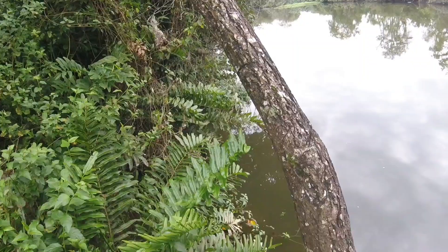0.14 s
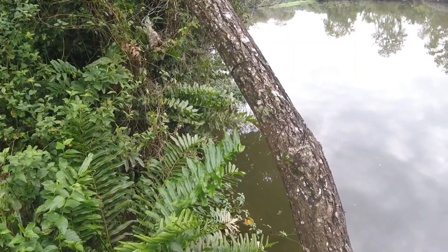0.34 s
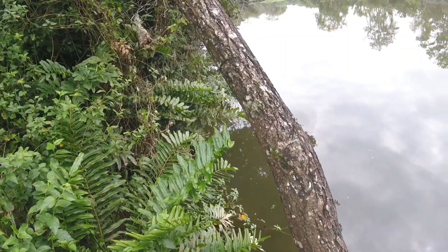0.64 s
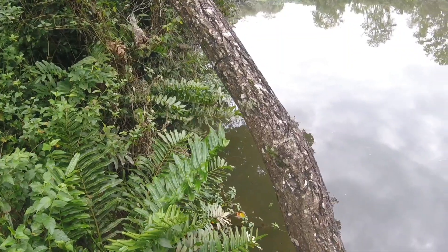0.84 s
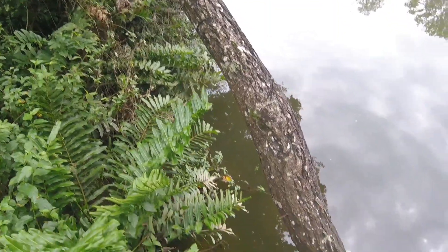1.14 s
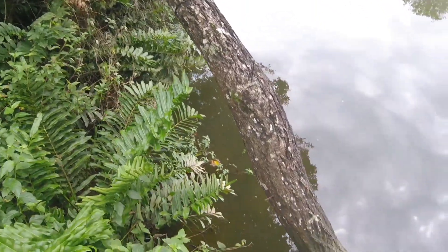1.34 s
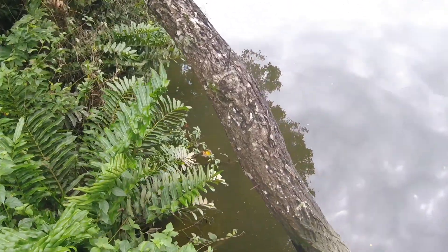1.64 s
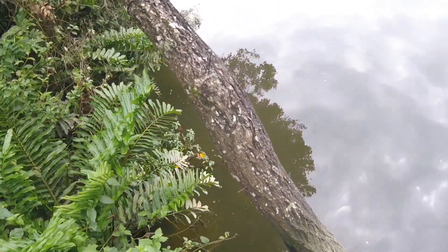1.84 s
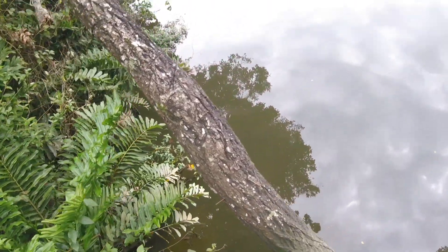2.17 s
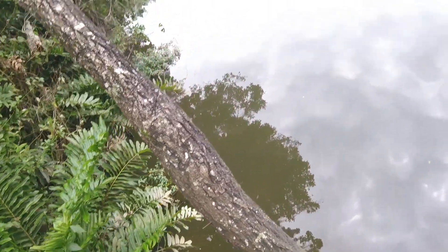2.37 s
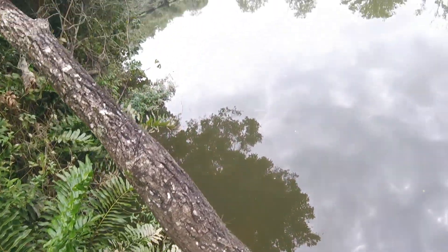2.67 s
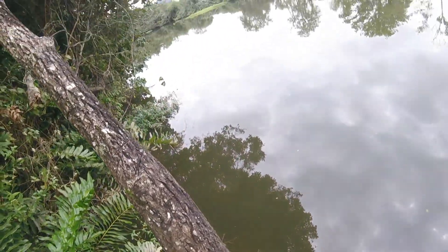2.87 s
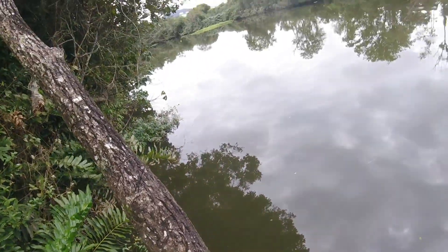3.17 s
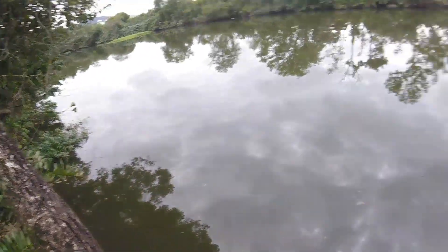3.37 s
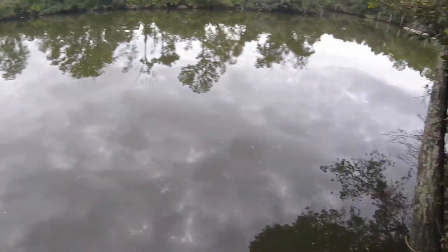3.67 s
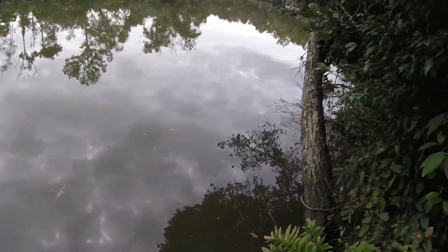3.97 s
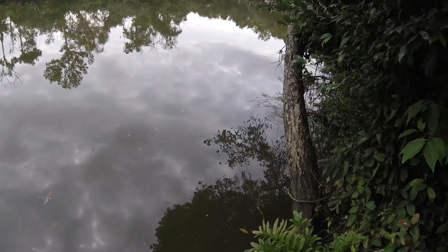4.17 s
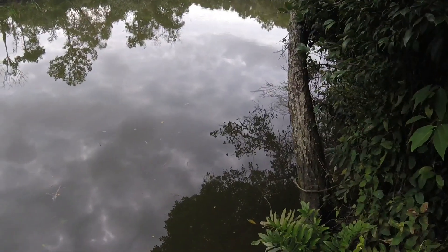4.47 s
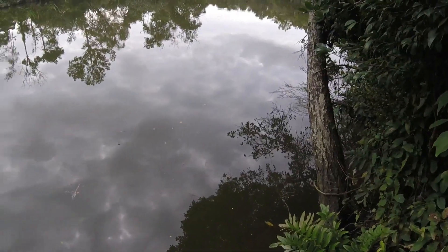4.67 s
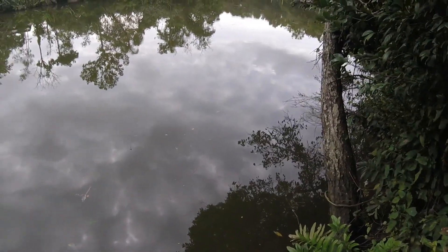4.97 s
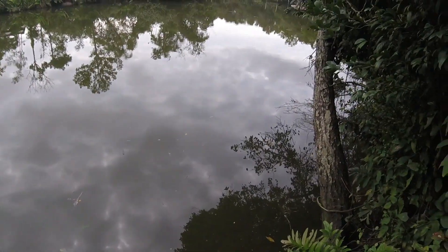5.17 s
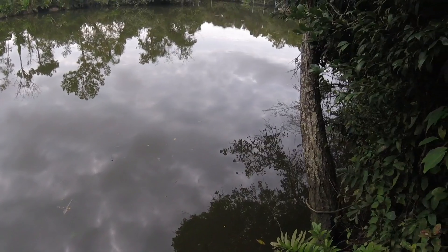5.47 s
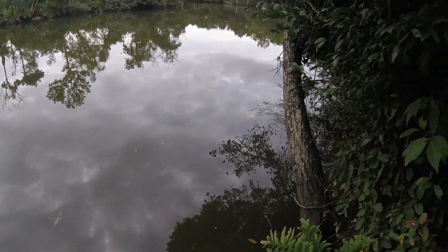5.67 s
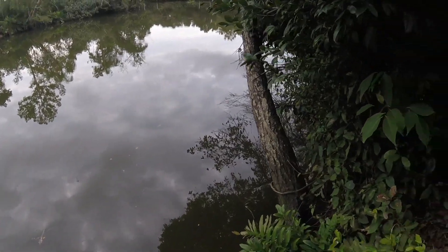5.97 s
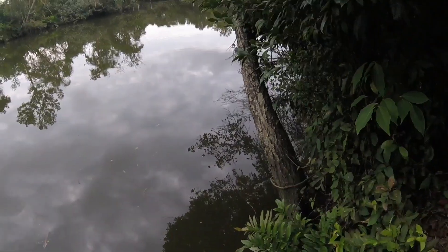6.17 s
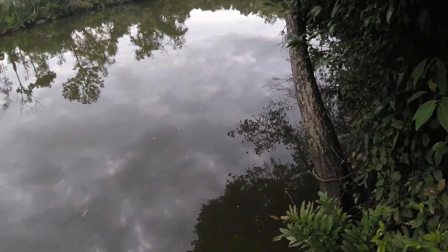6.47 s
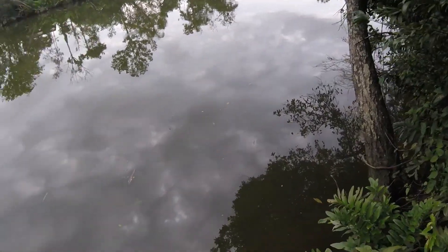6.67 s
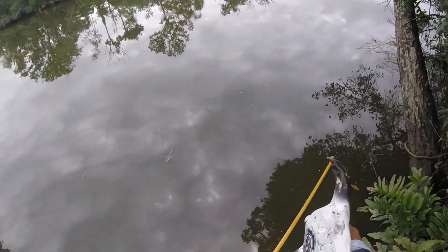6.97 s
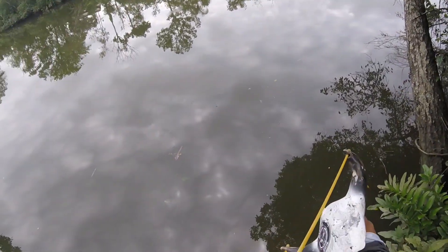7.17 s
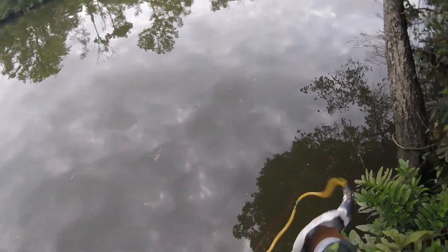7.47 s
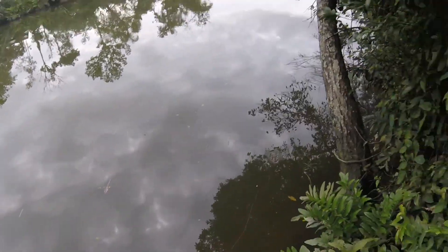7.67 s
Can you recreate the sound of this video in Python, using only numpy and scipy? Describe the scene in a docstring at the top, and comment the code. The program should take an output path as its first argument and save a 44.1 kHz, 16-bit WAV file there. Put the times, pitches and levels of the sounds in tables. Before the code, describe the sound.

Outdoors at a quiet pond, low far traffic rumbles under a thin, high insect hiss and a fast warbling cricket. A small animal's rattling trill starts slowly, quickens, and stops near the middle. Faint leaf swishes pass, a bird chips twice, and at the end gear close to the microphone knocks hollowly, scrapes and snaps.

```python
"""A still pond bank: far traffic rumbles under a chorus of insects, a cricket warbles,
a small animal trills and a bird chips twice. Noise shaped by spectra gives rumble, wind and chorus;
gliding sines and resonances give the engine and the voices. At the end gear is handled close to the
microphone: damped modes give hollow knocks, a sharp snap and scraping, and slow sines give low jolts."""
import sys
import numpy as np
from scipy import signal
from scipy.fft import rfft, irfft
from scipy.io import wavfile
from scipy.ndimage import uniform_filter1d

SR = 44100
rng = np.random.default_rng(int(sys.argv[2]) if len(sys.argv) > 2 else 0)


def persist_wave(psi):
    """Save psi, clipped to +-1, as 16-bit WAV."""
    counts = np.round(np.clip(psi, -1, 1) * 32767).astype(np.int16)
    wavfile.write(sys.argv[1], SR, np.atleast_2d(counts).T)


N = 345243  # length in samples


def amp(db):
    """Level: an amplitude ratio is ten to the power of dB / 20."""
    return 10 ** (np.asarray(db) / 20)


def evened(x):
    """Normalisation: dividing by the root mean square gives rms 1."""
    return x / np.sqrt(np.mean(x ** 2) + 1e-20)


def add(mix, s, sound):
    """Superposition: adds the sound to the mix from second s."""
    part = mix[round(s * SR):][:len(sound)]
    part += sound[:len(part)]


def resonate(x, hz, width):
    """Resonance by heterodyning: shifts hz down to zero, smooths, and shifts back, with gain 1."""
    turn = np.exp(2j * np.pi * np.cumsum(hz * np.ones(len(x))) / SR)
    r = np.exp(-np.pi * width / SR)
    return 2 * (turn * signal.lfilter([1 - r], [1, -r], x / turn)).real


def whistle(count, hz, width):
    """Narrow-band noise: a resonance applied twice to white noise gives a fuzzy tone of rms 1."""
    once = resonate(rng.standard_normal(count), hz, width)
    return evened(resonate(once, hz, width))


def hiss(spectrum, patchy_db):
    """Coloured noise: random short-time spectra with drifting patches, filtered to a spectrum, rms 1."""
    frames = N // 256 + 5
    a, b, patches = rng.standard_normal((frames, 513, 3)).T
    patches = uniform_filter1d(patches, size=14, axis=0)  # across frequency
    patches = evened(uniform_filter1d(patches, size=16, axis=1))  # across time
    fine = signal.istft((a + 1j * b) * amp(patchy_db * patches), nperseg=1024, noverlap=768)[1][:N]
    f, db = np.transpose(spectrum)
    log_hz = np.log(np.fft.rfftfreq(N, 1 / SR) + 1)
    gain = amp(np.interp(log_hz, np.log(f + 1), db))
    return evened(irfft(rfft(fine) * gain, N))


def glide(s, end, hz, db):
    """Frequency modulation: a soft-edged sine whose phase is the running sum of hz from s to end."""
    hz = (hz * np.ones(N))[round(s * SR):round(end * SR)]
    tone = np.sin(2 * np.pi * np.cumsum(hz) / SR)
    return s, amp(db) * tone * signal.windows.tukey(len(hz), .7)


def outdoors(x, t60, wet_db):
    """Diffuse scattering: trees and banks return a short tail that decays exponentially."""
    t = np.arange(SR // 2) / SR
    tail = rng.standard_normal(len(t)) * amp(-60 * t / t60) * (t > .004)
    return x + amp(wet_db) * signal.fftconvolve(x, tail / np.linalg.norm(tail))[:N]


def traffic():
    """Broadband and harmonic sources: rumble, steady drones, an engine's multiples and one brief tone."""
    # Far traffic and air. Each row: frequency in Hz, relative density in dB per Hz.
    rumble = [(26, -13.5), (45, 1.5), (70, -1.5), (91, -9.5), (112, -12), (168, -17.5), (251, -18),
              (290, -23), (614, -30), (1150, -33.5), (2500, -41), (3500, -44.5), (4000, -48), (4600, -51.5),
              (6000, -82)]
    # Steady drones of far machinery. Each row: frequency in Hz, width of one resonance in Hz, level in dB.
    drones = [(63.44, 5.8, -66.5), (122.7, 3.8, -64), (180.3, 5.8, -65), (249.5, 4.3, -74)]
    # A far engine revs up, eases off and climbs again. Each row: time in seconds, turns per second.
    engine_speed = [(2.3, 59), (2.55, 63), (3.47, 78), (3.62, 71.3), (3.88, 65.3), (4.4, 72.5), (5.6, 81)]
    # Multiples of its speed that carry this far. Each row: multiple, start and end in seconds, level in dB.
    engine_tones = [(4, 2.25, 2.62, -58), (4, 2.55, 2.92, -61), (7, 2.33, 2.65, -64), (6, 2.5, 3.1, -62),
                    (3, 2.55, 3.45, -62), (5, 2.95, 3.47, -62), (6, 3.0, 3.4, -69), (6, 3.62, 3.88, -61),
                    (2, 4.4, 5.6, -62)]
    # A brief steady tone: start and end in seconds, frequency in Hz, level in dB.
    brief_tone = (.1, .7, 535, -68)

    out = amp(-47) * hiss(rumble, patchy_db=-1.0)
    out += sum(amp(db) * whistle(N, hz, width) for hz, width, db in drones)
    speed = np.interp(np.arange(N) / SR, *np.transpose(engine_speed))
    for multiple, s, end, db in engine_tones:
        add(out, *glide(s, end, multiple * speed, db))
    add(out, *glide(*brief_tone))
    return out


def wind():
    """Pressure fluctuation: slow, lumpy air pressure on the microphone, mostly below the range of pitch."""
    # Gusts. Each row: centre in seconds, time from the centre to 1/e of the rise in seconds, rise in dB.
    gusts = [(0.0, 0.44, 6), (2.2, 1, 2.7), (6.6, 0.15, 10)]
    t = np.arange(N) / SR
    db = -53 + sum(rise_db * np.exp(-((t - s) / length) ** 2) for s, length, rise_db in gusts)
    # frequency in Hz, relative density in dB per Hz
    spectrum = [(4, -11), (12, 3.5), (20, 21.0), (32, 2.5), (45, -20), (60, -51.0)]
    return amp(db) * hiss(spectrum, patchy_db=-1.0)


def insects():
    """Incoherent sum and frequency modulation: a chorus, two steady crickets and one that warbles down."""
    # Many far insects merged into a hiss. Each row: frequency in Hz, relative density in dB per Hz.
    chorus = [(4300, -37), (4800, -16), (5200, -12.5), (6050, -14.5), (6480, -1), (6900, -7.5), (7600, -10),
              (9000, -12.5), (9900, -18.5), (10700, -21), (12200, -16.5), (13600, -24.5), (14500, -39),
              (15500, -68)]
    # Two steadier crickets. Each row: frequency in Hz, width of one resonance in Hz, level in dB.
    singers = [(5100, 30, -82), (4925, 60, -81)]
    # The warbling cricket's three notes. Each row: centre and length as shares of the cycle,
    # top pitch in Hz before the waver, level in dB before the waver and echo.
    cricket_notes = [(.03, .52, 5300, -71.5), (.39, .38, 5125, -73), (.67, .32, 4950, -75)]
    # Its pace. Each row: time in seconds, cycles sung.
    cricket_pace = [(0, -.23), (2.0, 13.76), (4.0, 27.99), (4.85, 33.84), (5.55, 38.95), (6.5, 45.62),
                    (7.83, 54.95)]
    note_arch_hz = 110  # each note bends up by this much and back
    waver_hz, waver_db = 30., 3.0  # rms

    out = amp(-65.5) * hiss(chorus, patchy_db=0.5)
    out += sum(amp(db) * whistle(N, hz, width) for hz, width, db in singers)
    cycle = np.interp(np.arange(N) / SR, *np.transpose(cricket_pace))
    waver = evened(uniform_filter1d(rng.standard_normal((2, N)), size=550))
    centre, length, hz, db = np.transpose(cricket_notes)[:, :, None]
    from_centre = (cycle - centre + .5) % 1 - .5
    arch = np.cos(np.pi * np.clip(from_centre / length, -.5, .5))
    pitch = hz + note_arch_hz * (arch - 1) + waver_hz * waver[0]
    loudness = amp(db + waver_db * waver[1]) * np.sqrt(abs(arch))
    notes = loudness * np.sin(2 * np.pi * np.cumsum(pitch, axis=1) / SR)
    return out + outdoors(notes.sum(0), t60=0.16, wet_db=-5.0)


def leaves():
    """Band-limited noise: each soft swish of leaves swells and fades under a raised cosine."""
    # Each row: centre in seconds, half of the whole length in seconds, centre frequency in Hz,
    # width of one resonance in Hz, level in dB before the swell.
    swishes = [(1.578, 0.11, 7450, 2500, -70), (1.98, .2, 5960, 900, -64.5),
               (2.162, 0.14, 6570, 1500, -64.5), (2.541, 0.091, 6760, 2500, -65),
               (2.203, .3, 1140, 600, -68.5), (3.886, 0.043, 1450, 600, -66),
               (4.914, .06, 8300, 1200, -68.5)]
    out = np.zeros(N)
    for s, length, hz, width, db in swishes:
        count = round(2 * length * SR)
        add(out, s - length, amp(db) * whistle(count, hz, width) * np.hanning(count))
    return out


def bird():
    """Exponential glide: each chip is a near sine that drops fast and then levels off."""
    # Each row: start in seconds, start and end pitch in Hz, level in dB before the fade and echo.
    chips = [(5.356, 6350, 5150, -69), (5.502, 6350, 5080, -66)]
    out, t = np.zeros(N), np.arange(round(.11 * SR)) / SR
    fade = signal.windows.tukey(len(t), .25) * amp(-80 * np.maximum(t - .03, 0))
    for s, hz, end_hz, db in chips:
        pitch = end_hz + (hz - end_hz) * np.exp(-t / .022)
        add(out, s, amp(db) * np.sin(2 * np.pi * np.cumsum(pitch) / SR) * fade)
    return outdoors(out, t60=.2, wet_db=-6)


def trill(gap=0.0071, pip_length=0.0043, stroke_length=0.004, length=0.0034, lead_db=-7.0, fade_db=-4.5):
    """Pulsed resonance: a pip and a steep falling stroke, over pulses that ring the throat's modes."""
    # Syllables: times in seconds, each 3 ms ahead of the middle of its pip.
    syllables = [.8994, 1.0237, 1.1537, 1.282, 1.3966, 1.5013, 1.606, 1.7005, 1.7923, 1.8733, 1.9558,
                 2.0245, 2.093, 2.156, 2.222, 2.282, 2.3406, 2.3979, 2.4545, 2.509, 2.5587, 2.6112, 2.6624,
                 2.7182, 2.7713, 2.8265, 2.8816, 2.9347, 2.9897, 3.043, 3.0979, 3.1557, 3.213, 3.2674,
                 3.3302, 3.3967, 3.455, 3.5442]
    # How the voice changes. Each row: time in seconds, effort in dB, pip pitch in Hz, pip over the pulses
    # in dB, falling stroke over the pulses in dB, stretch of the modes (ratio), centre of their ring in Hz.
    throat = [(.9, -69, 2900, -6, -11, 1., 3000), (1.5, -62, 2960, 0, -8, 0.98, 3020),
              (1.6, -59.5, 2220, -6, -16, 0.93, 3150), (1.7, -56.5, 2560, -6, -12, 0.89, 3300),
              (1.8, -53.5, 2600, -6, -10, 0.94, 3300), (1.9, -53.5, 2950, -5, -6, 0.91, 3270),
              (2.03, -52, 3340, -7, 1, 0.96, 3050), (2.23, -55, 3500, -4, 1, 0.98, 2950),
              (2.28, -52.5, 2600, -3, 4, 1, 2950), (2.35, -52.5, 2630, 2, -3, 1, 2950),
              (2.5, -55.5, 2720, 3, 4.5, 1, 2950), (2.65, -53.5, 2930, 2, 1, 0.96, 3000),
              (3.25, -53.5, 2880, 4, -5, 0.97, 2980), (3.4, -51.5, 2750, -4, -5, 1, 2840),
              (3.55, -53, 2520, -4, -6, .97, 2700)]
    # Modes of the throat. Each row: frequency in Hz before the stretch, relative level in dB.
    throat_modes = [(2287, -6), (2620, -4.5), (2965, -4.5), (3340, -4.5), (3670, -4)]
    stroke_hz, stroke_slope = 2885, -95000  # Hz at the middle of the stroke, Hz per s
    off_centre_db = -2.6  # loss of a mode 500 Hz from the centre, growing from pulse to pulse

    out, t = np.zeros((4, N)), np.arange(round(.07 * SR)) / SR - .024
    times, *columns = np.transpose(throat)
    mode_hz, mode_db = np.transpose(throat_modes)[:, :, None]
    pulse = np.array([-1, 1, 2, 3])[:, None, None]  # a faint lead-in, then three fading pulses
    pulse_db = np.where(pulse < 0, lead_db, fade_db * (pulse - 1))
    shape = np.exp(-((t - gap * pulse) / length) ** 2)
    u = t - gap  # time from the middle of the stroke
    stroke_shape = np.exp(-(u / stroke_length) ** 2)
    stroke_wave = stroke_shape * np.sin(2 * np.pi * (stroke_hz + stroke_slope * u / 2) * u)
    chances = rng.standard_normal((len(syllables), 3, 4, 5, 1))
    for k, (s, chance) in enumerate(zip(syllables, chances)):
        db, pip_hz, pip_db, stroke_db, stretch, centre_hz = (np.interp(s, times, c) for c in columns)
        pip = np.exp(-(t / pip_length) ** 2) * np.sin(2 * np.pi * pip_hz * t)
        pip = amp(pip_db + 1.1 * chance[0, 0, 0]) * pip
        stroke = amp(stroke_db) * stroke_wave
        loss_db = off_centre_db * abs(pulse) * ((mode_hz - centre_hz) / 500) ** 2
        level_db = mode_db + loss_db + pulse_db + 2. * chance[0]
        hz = stretch * mode_hz * (1 + 0.008 * chance[1])
        waves = np.sin(2 * np.pi * (hz * t + chance[2]))
        rung = (amp(level_db) * shape * waves).sum((0, 1))
        breathy = .03 * shape[1:].sum((0, 1)) * whistle(len(t), 3000, 1100)
        add(out[k % len(out)], s - .021, amp(db) * (pip + stroke + rung + breathy))
    # syllables take turns among four random echo tails, so the echo stays a diffuse haze
    return sum(outdoors(part, t60=0.55, wet_db=-5.0) for part in out)


def ring(hardness_db, rise, place_db=6):
    """Modal decay: one blow excites the gear's modes, a harder contact favours the high ones; peak 1."""
    # Modes of the hollow gear. Each row: frequency in Hz, relative level in dB before hardness and place,
    # time to decay by 60 dB in seconds.
    gear_modes = [(432, -13, 0.0092), (664, 3.5, 0.026), (734, -4.5, 0.034), (1023, -6.5, 0.03),
                  (1286, -0.5, 0.012), (1760, -7, 0.013), (2166, -14.5, 0.02), (2470, -9.5, 0.012),
                  (3130, -10, 0.006), (3580, -29, 0.02), (4270, -18, 0.0055), (5050, -18.5, 0.012),
                  (5640, -22, 0.021), (6350, -16.5, 0.0074), (7500, -27.5, 0.0039), (8280, -27, 0.0029),
                  (8900, -35, 0.0048), (11900, -76, 0.0023)]
    hz, db, t60 = np.transpose(gear_modes)[:, :, None]
    t, upper = np.arange(2500) / SR, np.minimum(hz / 4000, 1)
    turns, place = rng.random((2, len(gear_modes), 1))
    # each blow lands elsewhere and lifts the upper modes by other amounts, up to place_db
    level_db = db + place_db * upper * place + hardness_db * np.log2(hz / 1000)
    modes = amp(level_db - 60 * t / t60) * np.sin(2 * np.pi * (hz * t + turns * upper))
    sound = modes.sum(0) * np.sin(np.pi / 2 * np.minimum(t / rise, 1)) ** 2
    return sound / abs(sound).max()


def gear(grains_per_s=5000, spread_db=2.5, dull_hz=10200):
    """Impact and friction: blows, gritty scraping through the same modes, and decaying low jolts."""
    # Levels in these three tables hold ahead of the housing's filter.
    # Blows. Each row: start in seconds, peak in dB, hardness as dB gained per octave.
    blows = [(6.513, -45, 3), (6.694, -42, 13), (6.874, -25, -2), (6.8765, -33.5, -9), (6.885, -29.5, -5),
             (6.89, -31.5, -2.5), (6.903, -35, -6), (7.0985, -44, -9), (7.1018, -28.5, -18),
             (7.1022, -38, 6.5), (7.109, -43, 6), (7.1325, -40, 0), (7.146, -41.5, -14), (7.181, -47.5, 12),
             (7.442, -28, 6), (7.449, -35, -5), (7.4525, -19.5, 6.5), (7.46, -36, 17), (7.4705, -27, 2.5),
             (7.4785, -35, 22), (7.485, -35.5, -2), (7.499, -33, 33), (7.506, -17, 9.5), (7.5102, -29, 10),
             (7.513, -21.5, 9), (7.522, -34, 7), (7.555, -38, 3.5), (7.577, -48, 1), (7.582, -26, 8),
             (7.599, -30.5, 8), (7.604, -31, 1), (7.627, -33.5, 0.5), (7.722, -48, 0)]
    # Scrapes. Each row: start in seconds, hold in seconds, level in dB, hardness in dB per octave.
    scrapes = [(6.873, 0.018, -52, 12), (7.1, 0.009, -53.5, 7), (7.435, .002, -47.5, 7),
               (7.445, 0.0083, -38, 5.5), (7.464, .01, -40.5, 8), (7.483, 0.0093, -40.5, 13.5),
               (7.499, 0.024, -40.5, 8.5), (7.522, 0.037, -50, 20), (7.57, 0.014, -42.5, 6.5),
               (7.595, 0.022, -48.5, 10.5)]
    # Jolts that shake the microphone. Each row: start in seconds, level in dB before rise and decay,
    # frequency in Hz, time to decay by 60 dB in seconds.
    jolts = [(7.523, -26, 26.84, 0.85), (7.572, -22.5, 45.4, 0.16), (7.627, -29.5, 30.6, 0.94)]
    contact_s, contact_db = .0014, -1.5  # rise of a neutral blow, and its change in dB per step of hardness
    scrape_rise_s, scrape_fade = 0.0044, -900  # s, dB per s

    out = np.zeros(N)
    for s, db, hardness_db in blows:
        rise = np.clip(contact_s * amp(contact_db * hardness_db), .0002, .003)
        add(out, s, amp(db) * ring(hardness_db, rise))
    # sparse random grains of either sign
    grit = amp(spread_db * rng.exponential(1, N)) * rng.choice([-1, 1], N)
    grit *= rng.random(N) < grains_per_s / SR
    t = np.arange(SR // 3) / SR
    for s, hold, db, hardness_db in scrapes:
        grain = ring(hardness_db, 0.0001) * amp(-np.arange(2500) / 25)  # damped 1 dB more every 25 samples
        part = evened(signal.oaconvolve(grit[round(s * SR):][:SR // 8], grain)[:SR // 8])
        u = t[:len(part)]
        fade_db = scrape_fade * np.maximum(u - scrape_rise_s - hold, 0)
        add(out, s, amp(db + fade_db) * np.minimum(u / scrape_rise_s, 1) * part)
    for s, db, hz, t60 in jolts:
        swing = -amp(db - 60 * t / t60) * np.sin(2 * np.pi * hz * t)
        add(out, s, swing * np.minimum(t / 0.0156, 1))
    # carried through the housing, which passes no high treble
    return signal.sosfilt(signal.butter(10, dull_hz, fs=SR, output="sos"), out)


def snap():
    """Damped impact: one very hard, quickly damped blow, heard through the air."""
    # Start in seconds, level in dB before damping, hardness in dB per octave, extra damping in dB per second.
    s, db, hardness_db, damping_db = (7.4905, -5.5, 19, 10000)
    out = np.zeros(N)
    # a weak ring remains once the damping has acted
    damping = amp(-damping_db * np.arange(2500) / SR) + amp(-17)
    add(out, s, amp(db) * damping * ring(hardness_db, .0003, place_db=0))
    return out


def scene():
    """Superposition: the pressures of all sources add at one microphone."""
    return (traffic() + wind() + insects() + trill() + bird() + leaves() + gear() + snap())[None]


def record(dry):
    """Band limitation: the recorder passes nothing far above its edge frequency."""
    edge_hz = 14900
    lowpass = signal.firwin(511, edge_hz, window=("kaiser", 9), fs=SR)
    return signal.oaconvolve(dry, lowpass[None], "same")


dry = scene()
out = record(dry)
persist_wave(out)
```